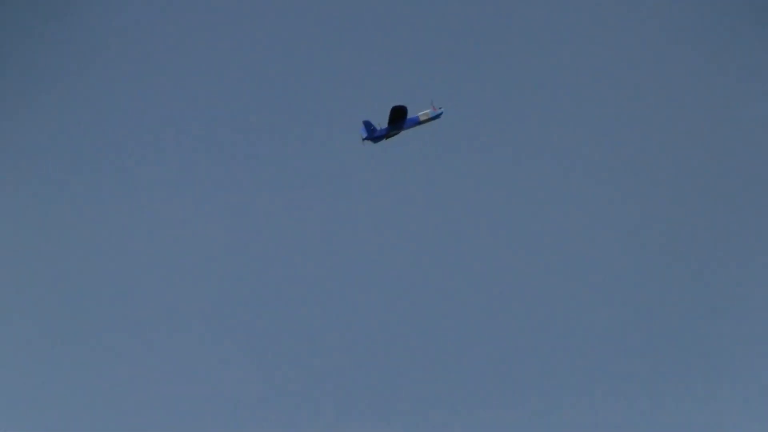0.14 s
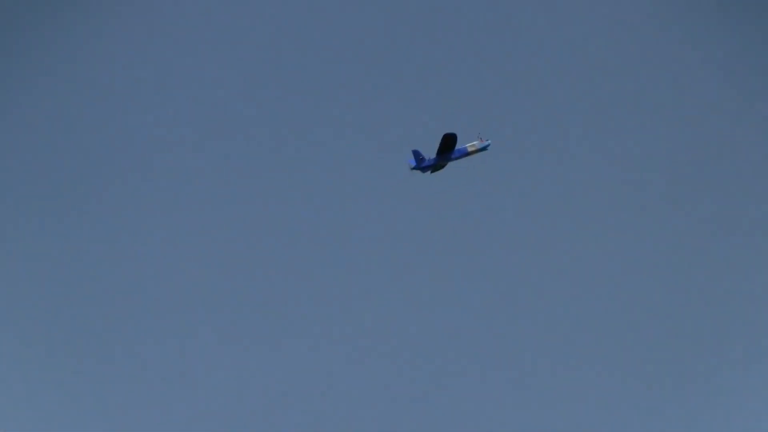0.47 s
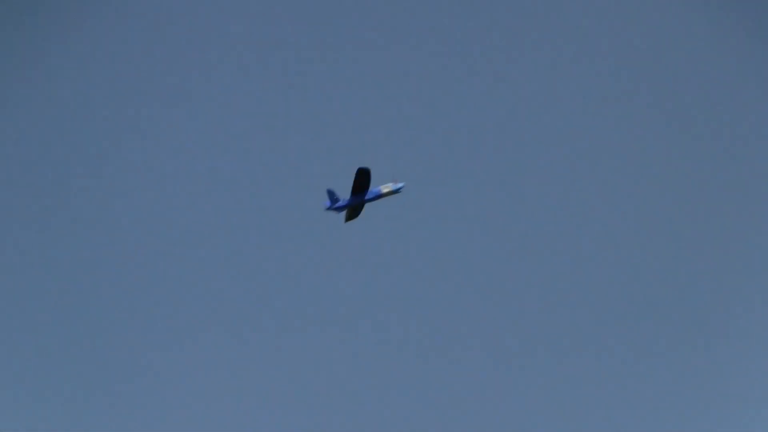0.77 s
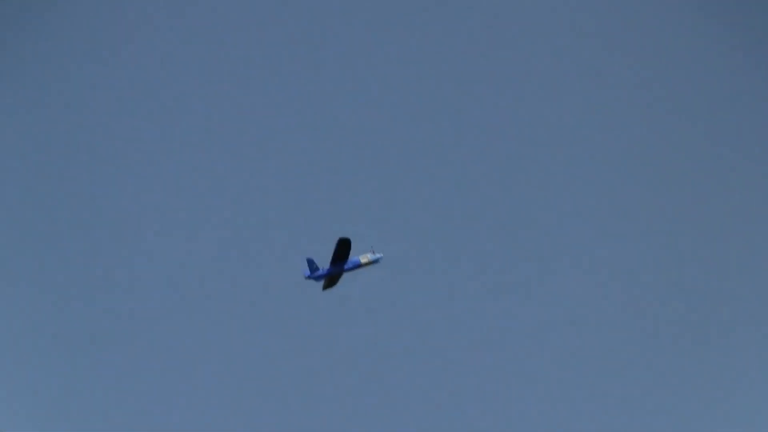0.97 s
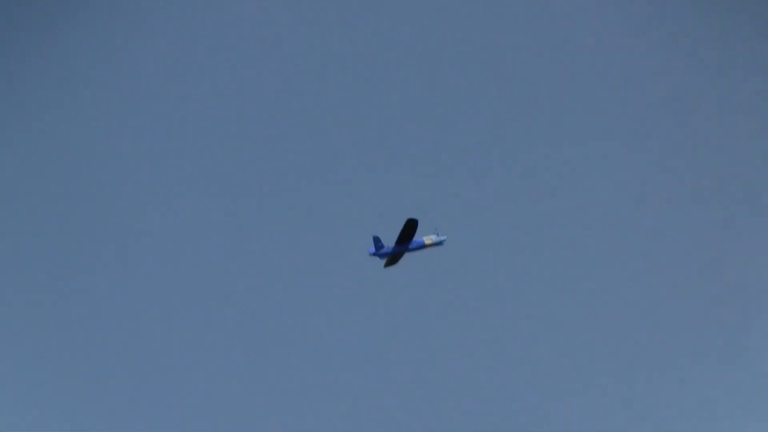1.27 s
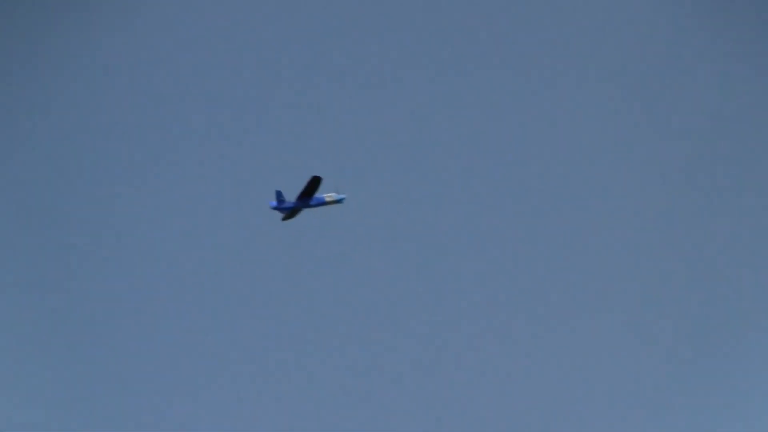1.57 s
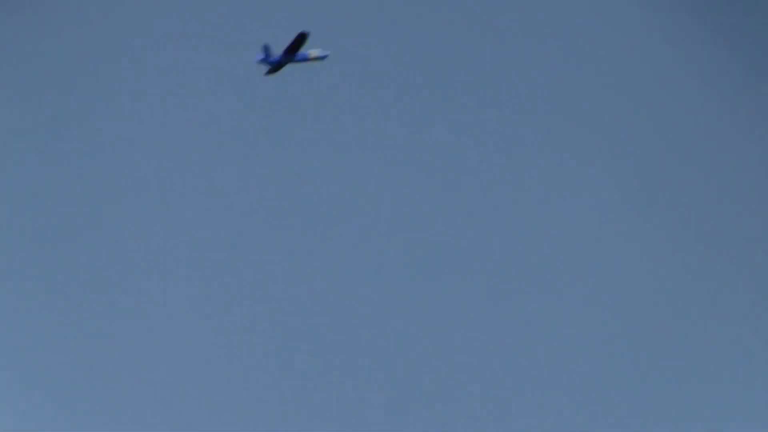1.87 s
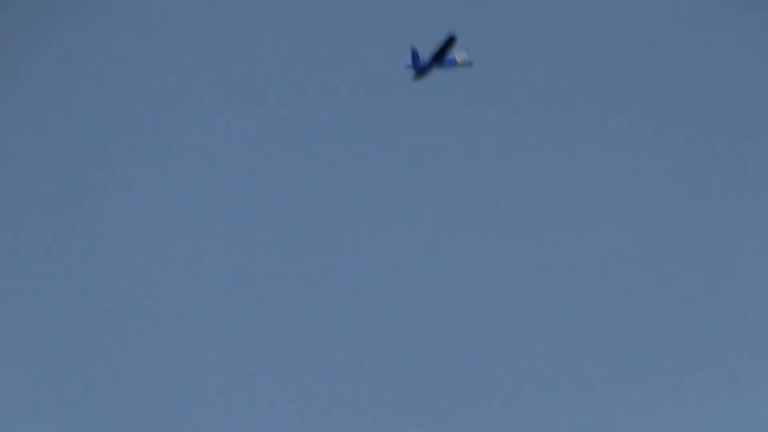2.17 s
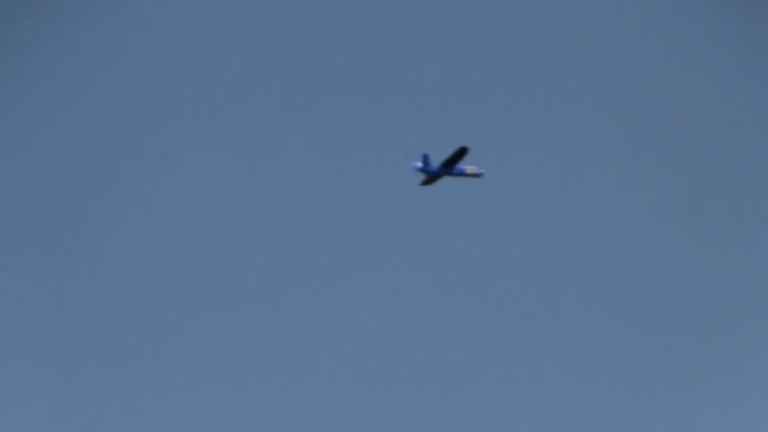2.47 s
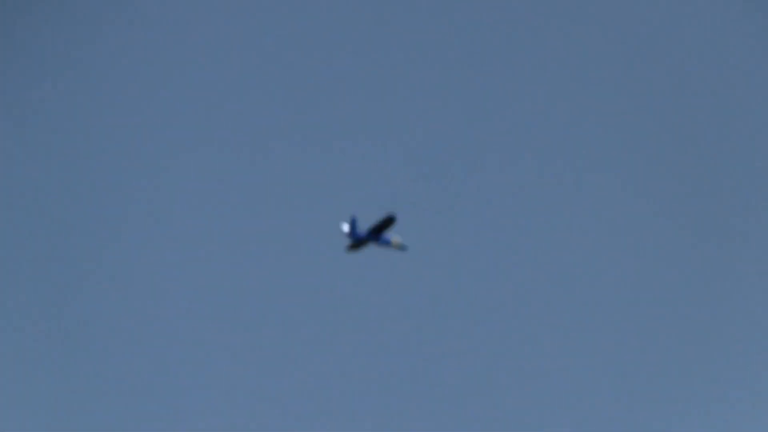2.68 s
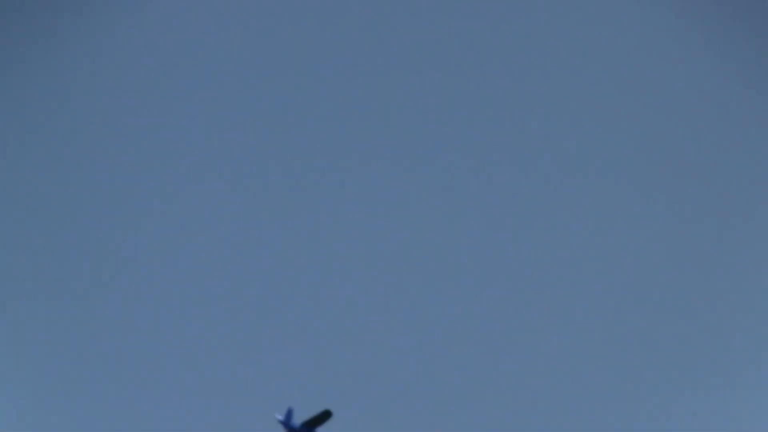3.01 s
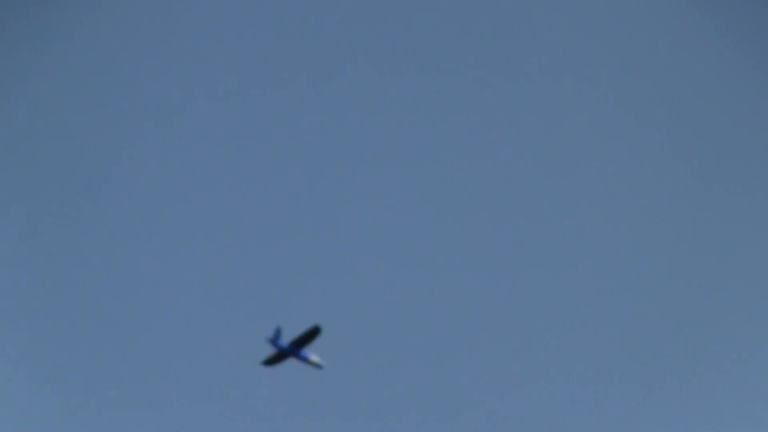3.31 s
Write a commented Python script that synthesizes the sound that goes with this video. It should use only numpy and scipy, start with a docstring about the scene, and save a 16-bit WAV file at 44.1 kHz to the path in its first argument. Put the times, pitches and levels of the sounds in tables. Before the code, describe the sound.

High piercing fan whine of a small model plane flying past, sliding lower amid fluttering hiss.

```python
"""Under an open sky a small electric model aircraft passes from left to right.
Its fan sings one high whine, a tone that falls with the Doppler shift, over a faint shaft tone.
Around it air noise, a low rush and a hiss, flutters in uneven air; one reflection with a sweeping lag combs it.
A faint rumble and one soft puff of wind on the microphone lie beneath."""
import sys
import numpy as np
from scipy import signal
from scipy.fft import rfft, irfft
from scipy.io import wavfile
from scipy.ndimage import uniform_filter1d, map_coordinates

SR = 44100
rng = np.random.default_rng(int(sys.argv[2]) if len(sys.argv) > 2 else 0)


def master_out(mix):
    """Clip the mix to full scale and print it as 16-bit PCM to the path in sys.argv[1]."""
    frames = np.transpose(np.atleast_2d(mix))
    ceiling = np.clip(frames, -1, 1)
    pcm = np.round(ceiling * 32767).astype(np.int16)
    wavfile.write(sys.argv[1], SR, pcm)


N = 152145
TIME_S = np.arange(N) / SR
BIN_HZ = np.arange(N // 2 + 1) * SR / N
# left and right take half of each port difference
SIDES = np.array([[.5], [-.5]])

# pitch of the whine before its waver: (time [s], frequency [Hz])
BLADE_PITCH = [(0, 8725), (0.8, 8705), (1, 8676), (1.2, 8627), (1.43, 8535), (1.65, 8428), (1.87, 8325),
               (2.09, 8196), (2.31, 8115), (2.53, 8051), (2.75, 7999), (2.97, 7960), (3.25, 7926),
               (3.45, 7890)]


def undb(db):
    """Decibels to gain."""
    return 10 ** (np.asarray(db) / 20)


def curve(table, axis=1):
    """One column of a table, joined by straight lines in time."""
    rows = np.array(table, float)
    return np.interp(TIME_S, rows[:, 0], rows[:, axis])


def over_hz(table):
    """Points joined on a log-frequency axis, for every spectral bin."""
    rows = np.array(table, float)
    return np.interp(np.log(BIN_HZ + 1), np.log(rows[:, 0] + 1), rows[:, 1])


def wander(hz):
    """Smooth random signal of spread 1, low-passed at hz."""
    spectrum = rfft(rng.standard_normal(N)) / np.sqrt(1 + (BIN_HZ / hz) ** 4)
    walk = irfft(spectrum, N)
    return walk / walk.std()


def scatter(hz):
    """Complex random gain of mean power 1 that spreads a tone by about hz to each side."""
    return (wander(hz) + 1j * wander(hz)) / np.sqrt(2)


def whine():
    """Blade tone of the fan: a clean line, a part that the air scatters into flutter, and a rough skirt."""
    # scattered part of the whine: (time [s], amplitude share [0-1])
    scattered = [(1.9, .29), (2.15, .2), (3.45, .1)]
    # whine before trim and flutter: (time [s], level [dB])
    whine_level = [(0.05, -58.5), (0.13, -50), (0.16, -54), (0.19, -46), (0.28, -55.5), (0.37, -48),
                   (0.44, -63), (0.51, -43), (0.58, -69), (0.64, -46), (0.7, -45), (0.73, -55), (0.79, -42),
                   (0.84, -46), (0.87, -60), (0.9, -44.5), (0.95, -41.5), (1.0, -46), (1.05, -52),
                   (1.16, -45), (1.19, -54), (1.22, -47), (1.35, -56.5), (1.41, -48.5), (1.47, -53),
                   (1.5, -46), (1.53, -56), (1.56, -44.5), (1.61, -59), (1.64, -40), (1.69, -44),
                   (1.72, -52), (1.78, -43), (1.815, -59), (1.85, -37.5), (1.872, -58), (1.895, -38),
                   (1.912, -63), (1.935, -36), (1.955, -55), (1.97, -41), (2.01, -61), (2.06, -40.5),
                   (2.16, -39.5), (2.19, -41), (2.22, -39.5), (2.67, -40), (2.71, -42.5), (2.76, -39.5),
                   (2.86, -37), (2.91, -42.5), (3.04, -39.5), (3.1, -47), (3.18, -43.5), (3.21, -50),
                   (3.26, -44.5), (3.38, -50.5), (3.41, -62), (3.45, -47.5)]
    # direction of the whine: (time [s], left minus right [dB])
    whine_pan = [(0.0, 6), (0.74, 3.5), (2.04, -3.5), (2.23, -7.5), (2.32, -5), (3.45, -6)]
    scatter_hz, skirt_hz, skirt_db = 45, 220, -13.5
    trim_db, flutter_db, flutter_hz = -0.5, 1.27, 33.2
    waver_hz = 45.5  # spread of the pitch at a share of 1

    share = np.clip(curve(scattered), 0, 1)
    line = np.sqrt(1 - share ** 2) + share * scatter(scatter_hz)
    body = line + undb(skirt_db) * scatter(skirt_hz)
    pitch_hz = curve(BLADE_PITCH) + waver_hz * share * wander(flutter_hz)
    phase = 2 * np.pi * np.cumsum(pitch_hz) / SR
    tone = np.sqrt(2) * np.real(body * np.exp(1j * phase))
    level_db = curve(whine_level) + trim_db + flutter_db * wander(flutter_hz)
    return tone * undb(level_db + SIDES * curve(whine_pan))


def shaft():
    """Faint sine once per turn of the fan, at the blade pitch over the number of blades."""
    # shaft tone: (time [s], RMS level [dB])
    shaft_level = [(0, -67.5), (.9, -64), (1.5, -65.5), (2.1, -66), (3.45, -92)]
    blades = 12
    phase = 2 * np.pi * np.cumsum(curve(BLADE_PITCH) / blades) / SR
    return np.sqrt(2) * undb(curve(shaft_level)) * np.sin(phase)


def reflected(x):
    """Sound plus one reflection: the lag shrinks to zero, then grows, and the echo strengthens."""
    zero_lag_s, lag_ms_per_s = 2.2, 1.28
    turn_rad, dull_hz = 1.95, 7400
    share_before, share_after, rise_s = .08, .46, .26

    since_s = TIME_S - zero_lag_s
    share = share_before + (share_after - share_before) * (1 + np.tanh(since_s / rise_s)) / 2
    # fixed phase turn and low-pass of the echo
    response = np.exp(-1j * turn_rad) / np.hypot(1, (BIN_HZ / dull_hz) ** 2)
    echo = irfft(rfft(x) * response, N)
    lag_s = lag_ms_per_s * abs(since_s) / 1000
    read_at = (TIME_S - lag_s) * SR
    late = map_coordinates(echo, [read_at], mode="mirror")
    return (x + share * late) / np.sqrt(1 + share ** 2)


def patchy(x, size=512):
    """Uneven air lifts and sinks neighbouring frequencies together for a moment."""
    patch_db, patch_hz, patch_s = 1.06, 800, .05
    hop_s = size / 2 / SR
    cells = signal.stft(x, nperseg=size)[2]
    gain_db = rng.standard_normal(cells.shape)
    gain_db = uniform_filter1d(gain_db, max(1, int(patch_hz * size / SR)), axis=0)
    gain_db = uniform_filter1d(gain_db, max(1, int(patch_s / hop_s)), axis=1)
    gain = undb(patch_db * gain_db / gain_db.std())
    return signal.istft(cells * gain, nperseg=size)[1][:N]


def air_noise():
    """Turbulent noise in five bands; its colour and direction turn with the aspect of the aircraft."""
    # rush before trim: (time [s], low level [dB], middle level [dB])
    rush = [(0.05, -55.5, -54.5), (0.15, -63, -55), (0.28, -55.5, -53.5), (0.5, -59.5, -54),
            (0.71, -58.5, -52), (1.2, -55.5, -52), (1.6, -55.5, -53), (1.7, -57.5, -49.5),
            (1.97, -59.0, -54.5), (2.08, -58, -51), (2.19, -62, -55), (2.38, -64, -51), (2.5, -59.5, -49.5),
            (2.7, -64.5, -52.5), (3.06, -64, -51.5), (3.45, -66, -53)]
    # low hiss, between rush and hiss, before flutter: (time [s], level [dB])
    low_hiss = [(0, -63), (.17, -57.5), (.5, -62), (.8, -57), (1.38, -60), (1.7, -55), (1.81, -60.5),
                (1.95, -55.5), (2.01, -66.5), (2.12, -53), (2.17, -56), (2.25, -53.5), (2.75, -55),
                (2.85, -57.5), (3.02, -54.5), (3.45, -58.5)]
    # hiss before trim and flutter: (time [s], level [dB], top-octave level [dB])
    hiss = [(0.0, -56, -63), (0.06, -58, -65), (0.08, -54.5, -55.5), (0.16, -47.5, -53.5),
            (0.28, -57.5, -63), (0.32, -51.5, -55.5), (0.43, -52.5, -61), (0.51, -52, -53),
            (0.57, -58.5, -67), (0.6, -49, -52), (0.74, -52.5, -59.5), (0.79, -46.5, -50), (0.83, -47, -52),
            (0.87, -52, -58.5), (0.95, -49.5, -56), (1.02, -49.5, -55), (1.11, -54.5, -60.0),
            (1.16, -50, -55), (1.3, -58, -66), (1.35, -52.5, -59), (1.38, -58, -67), (1.49, -52, -55.5),
            (1.53, -59.5, -64), (1.57, -50.5, -59), (1.6, -54, -60), (1.64, -46, -54.5),
            (1.78, -49.5, -53.5), (1.81, -59.5, -67), (1.85, -47.5, -50.5), (1.92, -53.5, -60),
            (1.96, -47, -49), (2.01, -60, -64), (2.05, -52, -54.5), (2.17, -47, -52), (2.25, -49, -55.5),
            (2.45, -49.5, -53.5), (2.95, -55.5, -59), (3.14, -57, -63.5), (3.26, -56.5, -61.0),
            (3.41, -59.5, -68.5), (3.45, -62, -64.0)]
    # times at which it is heard from ahead, abeam, half behind and behind [s]
    aspect_s = [.9, 1.75, 2.35, 3.0]
    # colour within each band, one list per aspect: (frequency [Hz], relative level [dB])
    colours = [
        [(30, -29), (80, -20), (120, -10), (170, -9.5), (270, -0.5), (420, 2.5), (600, -4.5), (1000, -5.5),
         (1750, -10), (2100, -13.5), (3000, -10.5), (4100, -13.5), (5000, -7), (5700, -5.5), (6300, -12),
         (7400, -7.5), (7700, -4.5), (8900, -5), (10000, -12), (11700, -20), (13000, -18), (15800, -25)],
        [(30, -41), (100, -24), (170, -15), (350, -3), (550, -2), (830, 1.5), (1150, -4.5), (1500, -1),
         (2150, -10.5), (2900, -6), (4600, -10.5), (5600, -7.5), (6200, -4.5), (6600, -5), (7500, -1.5),
         (8900, 0), (9800, -11.5), (10600, -10), (12500, -16.5), (15800, -19)],
        [(30, -29), (100, -17.5), (300, -3), (440, -10), (600, -0.5), (780, -1), (1050, -1.5), (1450, 0),
         (1950, -4.5), (2300, -6.5), (3900, -4), (4500, -9.5), (5600, -9.5), (6600, -6), (7500, 1.5), (8400, 2),
         (9500, -7.5), (12000, -14), (14000, -14), (15500, -12)],
        [(30, -38), (80, -10.5), (180, -5), (310, -10.5), (420, -10), (540, -0.5), (740, 3), (1050, -2.5),
         (1450, 2), (2200, -13.5), (2700, -10.5), (3900, -10.5), (4600, -15.5), (6300, -13.5), (7500, -10.5),
         (8400, -9.5), (9500, -15), (11000, -15), (12500, -23), (15800, -23)],
    ]
    # port balance, one list per aspect: (frequency [Hz], left minus right [dB])
    balances = [
        [(200, 0), (380, -2.0), (700, 0), (1290, -1), (2380, 1), (4400, 6), (8120, 2), (15000, 0)],
        [(200, -0.5), (380, -1), (700, -1.5), (1290, -0.5), (2380, -1), (4400, 3.5), (8120, -0.5), (15000, 4.5)],
        [(200, 0.5), (380, -2), (700, -0.5), (1290, -2.5), (2380, -2), (4400, 0), (8120, -1), (15000, 1.5)],
        [(90, -1), (200, 2), (380, -2.5), (700, -0.5), (1290, -1), (2380, -2.5), (4400, -1.5), (8120, -1),
         (15000, -0.5)],
    ]
    # phase lead of the left port, one list per aspect: (frequency [Hz], lead [rad])
    leads = [
        [(100, 0.085), (1600, 0.37), (2070, 1.66), (2650, 0.84), (3100, 1.1), (4050, 1.9), (5000, 1.1),
         (5500, 0.87), (6550, 1.25), (7600, 0.61), (15000, 0.16)],
        [(100, 0.3), (1600, 0), (2100, 0.81), (3600, 0), (4570, 1.9), (5400, 0.62), (6300, 0.68), (7700, 0.076)],
        [(100, 0), (15000, 0)],
        [(4400, 0.11), (7200, -1.2), (7700, 0.0065)],
    ]
    edges_hz = [10, 470, 2050, 4600, 9400, 30000]
    low_trim_db, mid_trim_db, hiss_trim_db, top_trim_db = 0.5, 0, 1.5, 1.5
    diffuse_db = -15.5  # noise that differs at the two ports, against the shared noise
    flutter_db, flutter_hz = 0.86, 30

    direct = rfft(patchy(reflected(rng.standard_normal(N))))
    diffuse = undb(diffuse_db) * rfft(rng.standard_normal((2, N)))
    flutter = flutter_db * wander(flutter_hz)
    levels_db = [
        curve(rush) + low_trim_db,
        curve(rush, axis=2) + mid_trim_db,
        curve(low_hiss) + flutter,
        curve(hiss) + hiss_trim_db + flutter,
        curve(hiss, axis=2) + top_trim_db + flutter,
    ]
    f = BIN_HZ + 1
    out = 0
    for colour, balance, lead, here in zip(colours, balances, leads, np.eye(len(aspect_s))):
        weight = np.interp(TIME_S, aspect_s, here)  # crossfade between aspects
        ports = undb(SIDES * over_hz(balance)) * np.exp(1j * SIDES * over_hz(lead))
        spectrum = undb(over_hz(colour)) * (ports * direct + diffuse)
        for low_hz, high_hz, level_db in zip(edges_hz, edges_hz[1:], levels_db):
            band = irfft(spectrum * ((f >= low_hz) & (f < high_hz)), N)
            # level is set on the mean of the two ports
            out = out + weight * undb(level_db) * band / band.mean(axis=0).std()
    return out


def breeze():
    """Low rumble of shaped noise, different at each port, and one soft puff on the microphone."""
    # rumble spectrum: (frequency [Hz], relative level [dB])
    rumble_shape = [(15, -27), (45, -10), (160, 0.5), (400, 6.5), (2000, -44), (15000, -45)]
    rumble_db = -75.5
    puff_s, puff_width_s, puff_hz, puff_db = 2.98, .03, 68, -69

    rumble = irfft(rfft(rng.standard_normal((2, N))) * undb(over_hz(rumble_shape)), N)
    swell = np.exp(-((TIME_S - puff_s) / puff_width_s) ** 2)
    puff = wander(hz=20) * np.sin(2 * np.pi * puff_hz * TIME_S) * swell
    return undb(rumble_db) * rumble / rumble.std() + undb(puff_db) * puff


def scene():
    """Whine, shaft tone and air noise of the passing aircraft, over a light breeze."""
    return whine() + shaft() + air_noise() + breeze()


def record(dry):
    """The recorder cuts the top steeply, with an elliptic low-pass."""
    top_hz, ripple_db, stop_db = 15800, .1, 70
    low_pass = signal.ellip(12, ripple_db, stop_db, top_hz, fs=SR, output="sos")
    return signal.sosfilt(low_pass, dry)


dry = scene()
out = record(dry)
master_out(out)
```